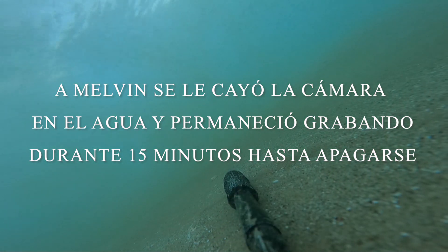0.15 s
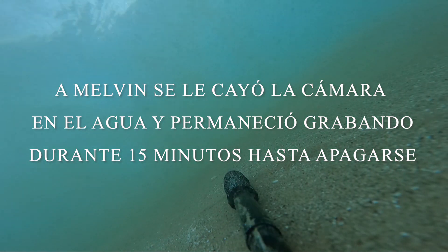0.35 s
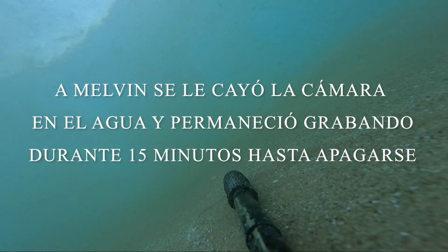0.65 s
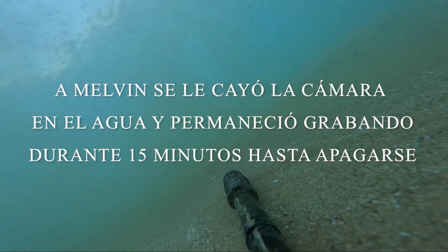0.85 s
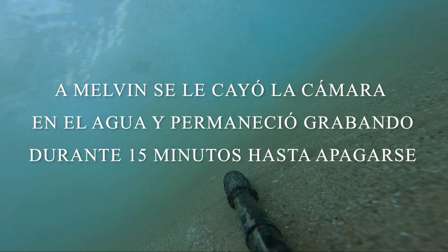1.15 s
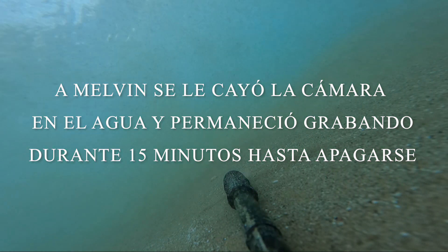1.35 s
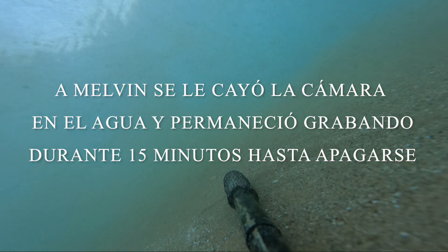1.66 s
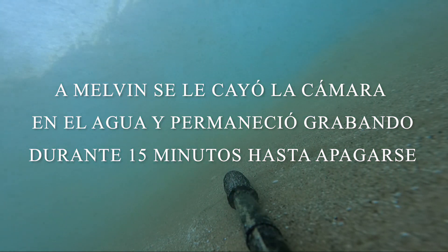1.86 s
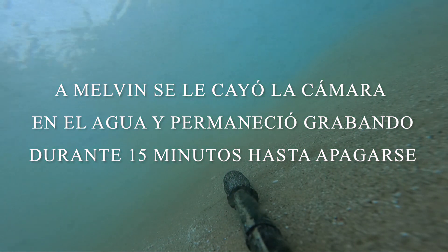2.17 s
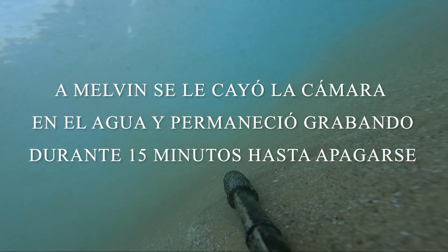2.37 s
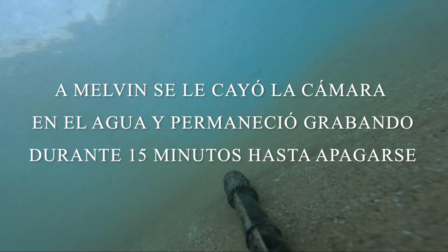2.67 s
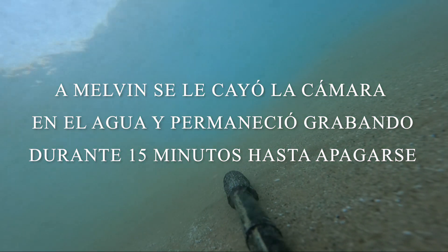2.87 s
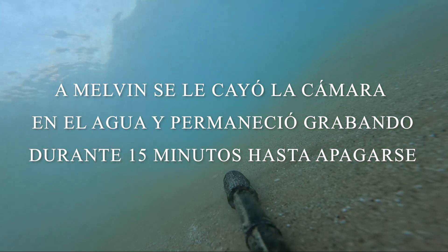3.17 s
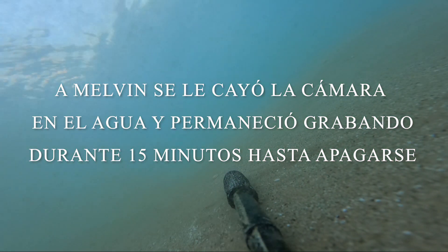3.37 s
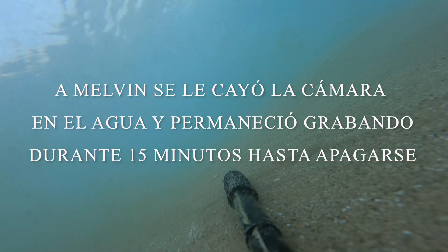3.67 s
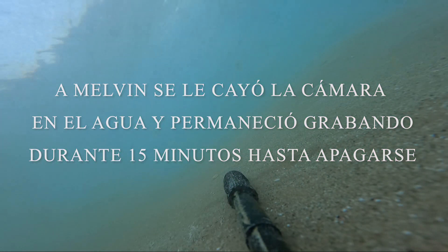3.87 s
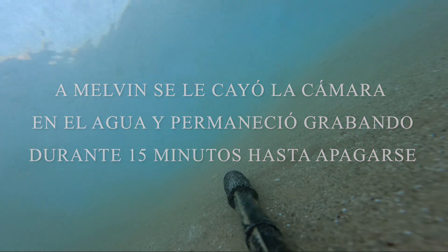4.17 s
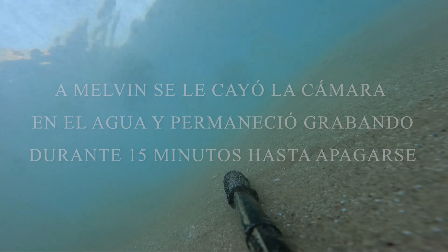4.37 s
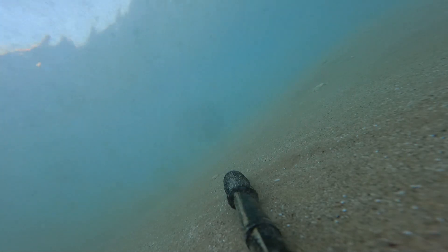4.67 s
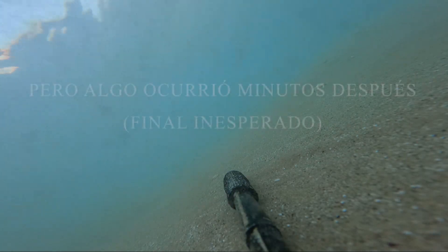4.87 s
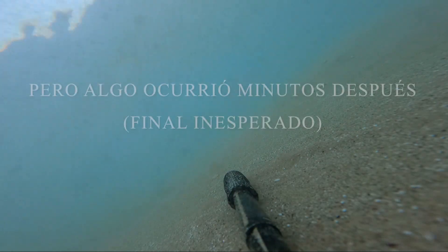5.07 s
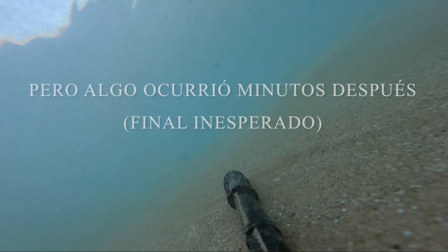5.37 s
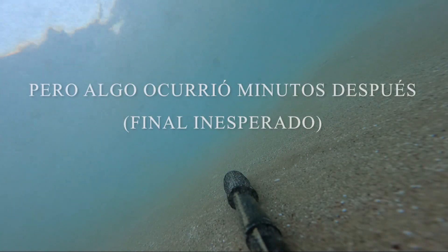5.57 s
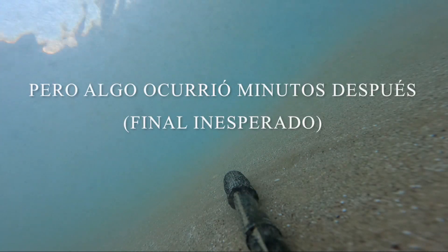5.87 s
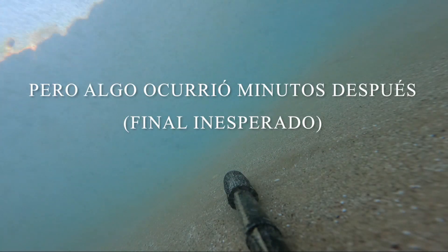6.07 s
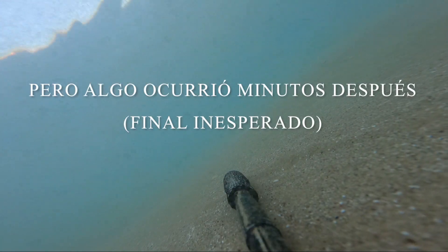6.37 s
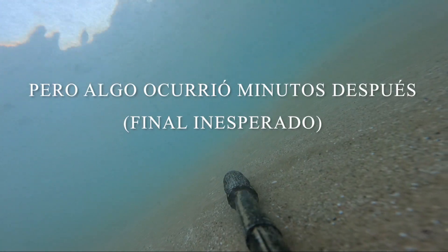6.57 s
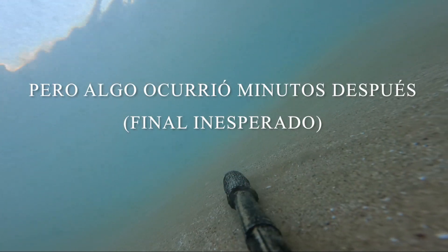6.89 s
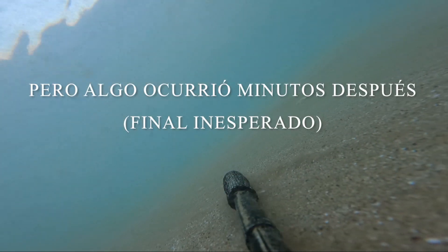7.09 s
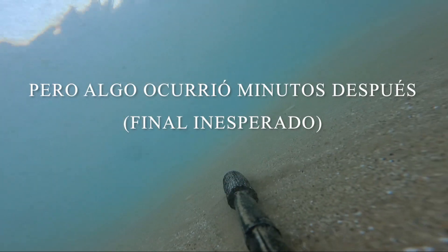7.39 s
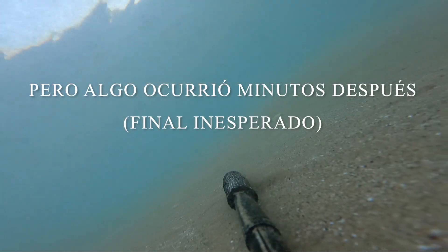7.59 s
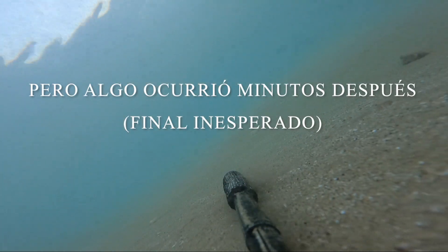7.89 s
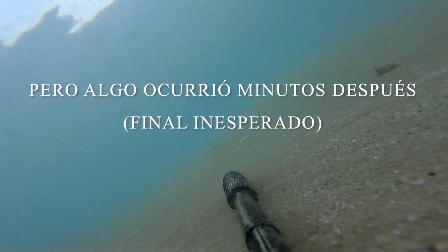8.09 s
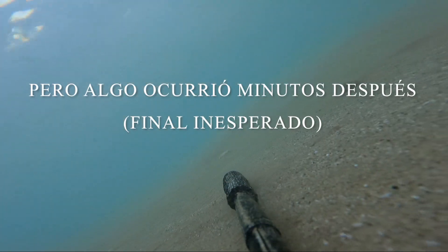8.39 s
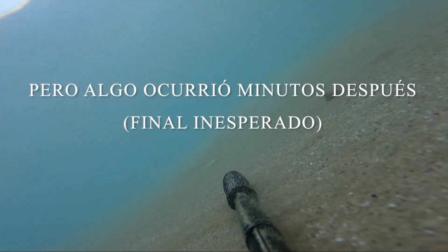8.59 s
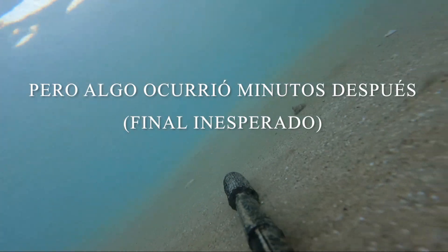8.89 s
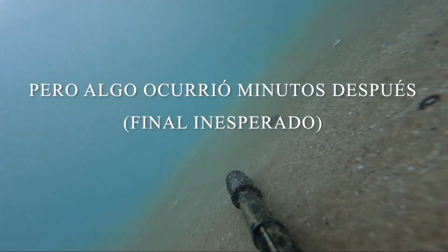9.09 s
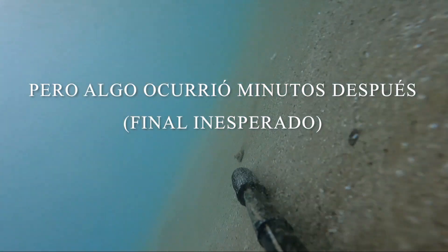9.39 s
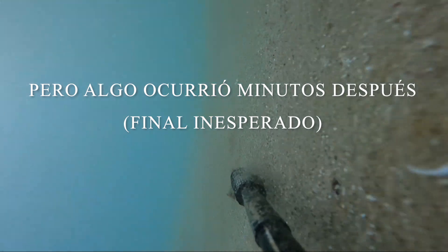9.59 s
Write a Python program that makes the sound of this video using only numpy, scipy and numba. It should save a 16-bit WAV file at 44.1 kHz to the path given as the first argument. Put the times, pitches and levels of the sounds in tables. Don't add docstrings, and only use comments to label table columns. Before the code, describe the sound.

Underwater, close and muffled, a sealed camera lies on a sandy bottom. A foamy wash with deep gulps and low wobbling rumble fades; a small bubbly crest passes, followed by dull thuds on sand. After a near-silent lull, waves build into a roaring churn with fizz and hissing sand, ending in scraping and fast hollow knocks.

```python
import sys
import numpy as np
from scipy import signal
from scipy.fft import rfft, irfft
from scipy.io import wavfile
from scipy.ndimage import uniform_filter1d
from numba import njit

SR = 44100
rng = np.random.default_rng(int(sys.argv[2]) if len(sys.argv) > 2 else 0)


def master(y):
    cut = np.clip(np.atleast_2d(y).T, -1, 1)
    pcm = np.round(cut * 32767)
    wavfile.write(sys.argv[1], SR, pcm.astype(np.int16))


def boost(x):
    u = np.asarray(x, float) / 20
    return 10 ** u


N = 429534

# [t/s, level/dB]
CHURN = [(0.0, -35), (1.1, -43.5), (1.9, -45.5), (2.33, -46.5), (2.6, -33), (2.82, -30.5), (3.2, -50.5),
         (4.1, -48.5), (4.3, -47.5), (4.55, -48.5), (4.83, -64.5), (6.07, -47.5), (6.67, -25.5),
         (7.13, -24.5), (8.11, -20.5), (8.6, -21), (9.3, -25.5), (9.74, -25.5)]
# [t/s, level/dB]
FLOW = [(0.0, -63.5), (0.9, -61), (1.4, -63.5), (2.45, -63.5), (2.64, -54), (2.74, -52.5), (2.93, -55.5),
        (3.71, -56.5), (4.03, -60.5), (4.97, -61), (5.86, -57), (6.53, -49), (6.93, -41.5), (7.79, -37),
        (8.89, -35.5), (9.4, -31.5), (9.6, -28), (9.74, -25.5)]
# [f/Hz, width/Hz, level/dB]
HOUSING = [(204, 100, 0), (380.4, 78, 3.5), (449, 98, -3), (583, 120, 4.5), (889, 230, -4), (1142, 58, 2),
           (1420, 55, 4.5), (1680, 54, 1.5), (1778, 50, 5), (1940, 69, -1), (2400, 600, 0.5),
           (2890, 270, 4), (4900, 62, -9.5), (4870, 130, 5.5)]
# [f/Hz, width/Hz, level/dB]
POLE = [
    (205.8, 30, 3),
    (383, 39, -6.5),
    (599, 45, -8.5),
]


def track(table):
    s, *columns = np.transpose(table)
    return [np.interp(np.arange(N) / SR, s, c) for c in columns]


def unit(x):
    return x / np.sqrt(np.mean(x ** 2))


def colour(x, points, bumps=()):
    hz = np.fft.rfftfreq(N, 1 / SR) + 1
    point_hz, point_db = np.array(points).T
    db = np.interp(np.log(hz), np.log(point_hz), point_db)
    db = db - 24 * np.log2(np.maximum(hz / point_hz[-1], 1))
    db = db + sum(d / (1 + (2 * (hz - f) / w) ** 2) for f, w, d in bumps)
    return unit(irfft(rfft(x) * boost(db), N))


def walk(rate):
    k = int(SR / rate)
    held = np.repeat(rng.standard_normal(N // k + 1), k)
    return 1.297 * uniform_filter1d(uniform_filter1d(held, k), k)[:N]


def swells(s, db, rise_db_s, fall_db_s):
    t = np.arange(0, N + 64, 64)[:, None] / SR
    below_peak_db = np.maximum((s - t) * rise_db_s, (t - s) * fall_db_s)
    power = boost(2 * (db - below_peak_db)).sum(axis=1)
    return np.interp(np.arange(N) / SR, t[:, 0], power)


@njit
def ring(start, hz, t60, peak, glide, length):
    y = np.zeros(length)
    for k in range(len(start)):
        steps = int(t60[k] * SR * .8)
        z, turn = peak[k] + 0j, np.exp((2j * np.pi * hz[k] - np.log(1000) / t60[k]) / SR)
        bend = np.exp(2j * np.pi * hz[k] * (glide - 1) / SR / steps)
        for i in range(start[k], min(start[k] + steps, length)):
            z *= turn
            turn *= bend
            y[i] += z.imag
    return y


def soft_rings(table, glide, quick):
    s, db, hz, t60 = table
    at = (s * SR).astype(np.int64)
    slow_ring = ring(at, hz, t60, boost(db + 3.5), glide, N)
    return slow_ring - ring(at, hz, quick * t60, boost(db + 4.5), 1 + quick * (glide - 1), N)


def cloud(points, bumps, count, cycles, scatter_db, flicker_db, flicker_rate, hush_db):
    lo, hi = points[0][0], points[-1][0]
    when, size, strength = rng.random((count, 3)).T
    hz = lo * (hi / lo) ** size
    peak = hz * boost(-scatter_db * np.log(np.maximum(strength, 1 / 300)))
    bubbles = ring((when * N).astype(np.int64), hz, cycles / hz, peak, 1.196, N)
    hush = colour(rng.standard_normal(N), points, bumps)
    mix = colour(bubbles, points, bumps) + boost(hush_db) * hush
    return unit(mix * boost(flicker_db * walk(flicker_rate)))


def fed(layer, coarse=0):
    feeds = {"large": (-5.5, -8.5, 1.4, -1.5, -64.5), "middle": (-13, -3.5, 0.52, -2, -58.5),
             "small": (-15.5, 2.5, 0.77, -11, -53), "fizz": (-16.5, 1.5, 0.76, -29, -62.5)}
    # [t/s, peak/dB, rise/(dB/s), fall/(dB/s), coarseness/dB]
    foam_clouds = [(0.0, -20, 63, 18, 1), (0.6, -33, 62.5, 29.5, -1), (0.85, -34.5, 57, 53, 3),
                   (1.1, -39, 62, 6, -0.5), (2.03, -36.5, 54.5, 31.5, -14), (2.33, -45, 38, 32, -8.5),
                   (2.66, -31, 46, 31.5, 5.5), (3.0, -41, 60.5, 25.5, -8.5), (3.4, -42, 39.5, 28, -7.5),
                   (3.58, -40, 42.5, 28, -9.5), (4.3, -51.5, 93, 62, -12.5), (4.48, -50.5, 93, 92, -2),
                   (5.37, -53, 200, 11, 1.5), (5.75, -49.5, 40.5, 13, 0.5), (6.18, -34, 395, 26.5, 2),
                   (6.5, -35, 36.5, 27, 6), (7.05, -32, 58.5, 25.5, 9), (7.51, -26.5, 60, 70, 1),
                   (7.8, -32, 57.5, 61, 2.5), (8.11, -30, 58, 92, 1), (8.79, -31.5, 61, 30, -5),
                   (9.33, -34, 91.5, 29, 0), (9.52, -26, 87.5, 95, -2), (9.72, -29, 54.5, 29.5, 2)]
    full_flow_db = -38
    churn_db, flow_db, follows, foam_db, calm_db = feeds[layer]
    s, db, rises, fades, coarse_db = np.transpose(foam_clouds)
    foam = swells(s, db + foam_db + coarse * coarse_db, rises, fades)
    flow = full_flow_db + flow_db + follows * (track(FLOW)[0] - full_flow_db)
    return np.sqrt(boost(2 * (track(CHURN)[0] + churn_db)) + boost(2 * flow) + foam + boost(2 * calm_db))


def roar():
    # [f/Hz, level/dB]
    spectrum = [(25, -31), (55, -1), (78, 6), (120, 3.5), (160, 1), (260, -43)]
    return boost(track(CHURN)[0]) * cloud(spectrum, HOUSING, count=6000, cycles=11., scatter_db=1.4,
                                        flicker_db=1.5, flicker_rate=3.6, hush_db=2.0)


def large_bubbles():
    # [f/Hz, level/dB]
    spectrum = [(100, -36), (135, -7.5), (160, 0), (225, 0), (265, -8), (400, -32.5)]
    return fed("large", coarse=.6) * cloud(spectrum, HOUSING, count=5000, cycles=15.0, scatter_db=-0.4,
                                           flicker_db=1.0, flicker_rate=13, hush_db=-2.0)


def middle_bubbles():
    # [f/Hz, level/dB]
    spectrum = [(170, -33.5), (230, -3.5), (260, 2.5), (400, -1.5), (460, -1), (700, -28.5)]
    return fed("middle", coarse=-0.34) * cloud(spectrum, HOUSING, count=7000, cycles=19.2, scatter_db=2.0,
                                               flicker_db=1.32, flicker_rate=9.9, hush_db=-1)


def small_bubbles():
    # [f/Hz, level/dB]
    spectrum = [(300, -33.5), (410, -1), (450, -5.5), (730, -3.5), (800, -11), (1100, -32.5)]
    return fed("small") * cloud(spectrum, HOUSING, count=10000, cycles=15.0, scatter_db=1.0,
                                flicker_db=0.5, flicker_rate=11, hush_db=-5)


def fizz():
    # [f/Hz, level/dB]
    spectrum = [(500, -18.5), (800, -2.5), (1050, -1), (1490, -4.5), (1550, -11.5), (1900, -14),
                (2300, -25.5), (3500, -53)]
    return fed("fizz") * cloud(spectrum, HOUSING, count=20000, cycles=22.0, scatter_db=1.5,
                               flicker_db=1.3, flicker_rate=11, hush_db=0.5)


def sand():
    # [f/Hz, level/dB]
    spectrum = [(1100, -37), (1500, -6), (1750, -4.5), (2300, -3), (3500, -10.5), (3800, -19), (5300, -26),
                (5900, -39.5), (7300, -46), (10500, -66)]
    # t/s, depth/dB, half length/s
    hiss_dip = (9.54, -8, 0.045)
    s, depth_db, half = hiss_dip
    db = track(FLOW)[0] + depth_db * np.exp(-((np.arange(N) / SR - s) / half) ** 2)
    return boost(db) * cloud(spectrum, HOUSING, count=50000, cycles=8.1, scatter_db=3.0,
                           flicker_db=0.35, flicker_rate=7.8, hush_db=2.5)


def grit():
    # [f/Hz, level/dB]
    spectrum = [(2500, -13.5), (3600, -5.5), (5200, -8.5), (6700, -13.5), (8000, -26), (10500, -50)]
    # [t/s, peak/dB, rise/(dB/s), fall/(dB/s)]
    stirred = [
        (2.56, -74.5, 60, 30),
        (2.7, -69.5, 40, 30),
        (3.5, -77, 20, 15),
        (4.2, -78.5, 20, 21),
    ]
    steady_db = -76
    gain = np.sqrt(boost(2 * steady_db) + swells(*np.transpose(stirred)))
    return gain * boost(.8 * walk(11)) * colour(rng.standard_normal(N), spectrum)


def surf():
    eddies = walk(16)
    gurgle = boost(0.5 * (eddies - uniform_filter1d(eddies, size=SR // 4)))
    finer = small_bubbles() + fizz() + sand()
    return roar() + large_bubbles() + middle_bubbles() + gurgle * finer + grit()


def seethe():
    # [t/s, peak/dB, rise/(dB/s), fall/(dB/s)]
    sheets = [(1.9, -61, 8, 13.5), (2.3, -64, 13, 19.5), (2.55, -57, 30.5, 27.5), (2.72, -50.5, 33, 23.5),
              (2.9, -52.5, 31, 24.5), (4.6, -59.5, 8, 6), (3.2, -53.5, 21.5, 16.5), (6.3, -47, 29.5, 14.5),
              (6.8, -42.5, 25.5, 27.5), (7.0, -39.5, 59, 41.5), (7.6, -42.5, 40.5, 39.5),
              (9.0, -33, 39.5, 30), (8.3, -40.5, 91, 91), (9.33, -27.5, 87.5, 23), (9.5, -27.5, 88, 60),
              (9.66, -24, 58.5, 13.5)]
    # [f/Hz, level/dB]
    spectrum = [(700, -30), (960, -19.5), (1060, 0), (1480, -2.5), (1600, -8), (1850, -10.5), (2050, -25),
                (2600, -42)]
    return swells(*np.transpose(sheets)) ** .5 * cloud(spectrum, HOUSING, count=9000, cycles=15.0, scatter_db=2.0,
                                                       flicker_db=-0.55, flicker_rate=12, hush_db=-2.5)


def pressed(water):
    # [f/Hz, width/Hz, level/dB]
    shifted_rings = [(2120, 230, -6), (2360, 150, 3.5), (1280, 160, -2), (905, 100, -0.5)]
    begins_db, span_db = -52, 10.5
    share = np.clip((track(FLOW)[0] - begins_db) / span_db, 0, 1)
    changed = colour(water, [(20, 0), (20000, 0)], shifted_rings) * np.std(water)
    return water + share * (changed - water)


def rocking():
    # [t/s, level/dB, f/Hz]
    swing_path = [(0.0, -24.5, 36.93), (0.4, -30, 43.5), (1.0, -28, 40.07), (1.4, -29, 46.98),
                  (1.92, -27.5, 44.81), (2.2, -32, 36.01), (2.85, -33, 37.06), (3.17, -40.5, 36.8),
                  (3.45, -38, 33.76), (3.9, -35, 34.18), (4.2, -40, 30.02), (4.55, -39, 35.33),
                  (5.0, -52, 31.02), (6.1, -46, 31.26), (6.6, -37, 44.03), (7.0, -37.5, 52.8),
                  (8.3, -35, 54), (9.74, -29.5, 54.65)]
    # [t/s, peak/dB]
    shoves = [(0.0, -24), (0.11, -25.5), (0.24, -16), (0.36, -16.5), (0.5, -17), (0.65, -18), (0.73, -14.5),
              (0.86, -14), (.98, -22), (1.1, -25), (1.22, -23), (1.33, -19), (1.57, -23.5), (1.69, -28),
              (1.9, -25), (2.19, -27), (2.28, -28), (3.53, -35), (3.63, -25.5), (3.94, -24.5), (4.09, -33),
              (4.32, -21), (4.48, -29), (4.57, -32), (5.42, -45), (6.48, -37), (6.55, -32), (6.97, -25),
              (7.16, -33.5), (7.32, -24), (8.3, -26), (8.66, -28), (8.79, -26), (8.9, -27), (9.41, -26.5),
              (9.66, -17.5)]
    # [t/s, level/dB]
    rocking_dips = [
        (3.56, 0),
        (3.59, -14),
        (3.8, -14),
        (3.86, 0),
        (4.2, 0),
        (4.23, -9),
        (4.36, -9),
        (4.4, 0),
    ]
    db, hz = track(swing_path)
    size = np.sqrt(boost(2 * db) + swells(*np.transpose(shoves), rise_db_s=249, fall_db_s=167.5))
    phase = 2 * np.pi * np.cumsum(hz * (1 + .07 * walk(16))) / SR
    swing = np.sin(phase) * boost(1.8 * walk(11))
    spectrum = [(8, -28.5), (22, -1.0), (45, -4.0), (70, -13), (140, -42.5), (400, -65.5)]
    eddies = colour(rng.standard_normal(N), spectrum)
    return size * boost(track(rocking_dips)[0]) * unit(unit(swing) + boost(-2) * eddies)


def knocks():
    # [t/s, peak/dB, brightness/dB]
    blows = [(9.255, -9.5, -19), (9.284, -11, -18.5), (9.33, -8.5, -18), (9.359, -15, -9.5),
             (9.383, -15, -12), (9.412, -5.5, -12.5), (9.436, -11.5, -17), (9.476, -8.5, -8.5),
             (9.494, -12.5, -16), (9.5109, -3, -13), (9.556, -10.5, -17), (9.588, -11, -13),
             (9.616, -7, -20), (9.671, -11, -16), (9.698, -13, -14.5), (9.718, -5, -16)]
    sag_per_s = .15
    s, db, bright_db = np.transpose(blows)
    pole = np.zeros(N)
    for k, (hz, _, ring_db) in enumerate(POLE):
        peak_db = db - 6 + (k > 0) * (bright_db + ring_db + 13)
        pitch = hz * (1 - sag_per_s * (s - 9.5))
        t60 = 2.4 / hz ** .5 + 0 * s
        pole += soft_rings((s, peak_db, pitch, t60), glide=.98, quick=.12)
    return pole


def thumps():
    # [t/s, peak/dB, f/Hz, t60/s]
    bumps_on_sand = [(3.625, -13.5, 37.5, 0.22), (3.651, -14.5, 37.7, 0.19), (3.716, -13, 34.6, 0.34),
                     (3.773, -23, 40.5, .16), (4.222, -23.5, 40, 0.25), (4.253, -26, 69, 0.092),
                     (4.345, -24.5, 75, 0.11), (4.8, -45.5, 100, .2), (4.281, -18, 50, 0.11),
                     (4.315, -16.5, 40.1, 0.15), (4.442, -25, 85.8, 0.15), (4.466, -27, 45.6, .2),
                     (4.53, -32.5, 93, 0.27), (4.49, -34, 120, .15), (4.58, -39, 70, .2),
                     (5.42, -42.5, 80, .2), (5.98, -38, 60, .15), (2.25, -33, 80, .15), (4.07, -32, 35, .2)]
    return soft_rings(np.transpose(bumps_on_sand), glide=0.99, quick=0.15)


def drag():
    # [t/s, level/dB]
    scrapes = [(8.9, -23), (9.1, -23), (9.2, -25), (9.26, -30), (9.39, -28), (9.45, -29), (9.52, -32),
               (9.6, -28), (9.74, -28)]
    db, = track([(scrapes[0][0] - .15, -70)] + list(scrapes))
    modes = [(f, w, d + 30) for f, w, d in POLE]
    spectrum = [(100, -18.5), (180, -0.5), (650, -2.5), (900, -24.5)]
    return boost(db - 3.5) * colour(rng.standard_normal(N), spectrum, modes)


def pops():
    # [t/s, peak/dB, f/Hz, t60/s]
    bubbles = [(0.688, -33.5, 1070, 0.055), (0.808, -41, 1326, 0.037), (0.8798, -32.5, 1380, 0.036),
               (0.8977, -35.5, 1330, 0.032), (0.9, -41, 1700, .025), (0.632, -41, 1440, 0.032),
               (0.752, -41.5, 1450, .025), (1.035, -40, 1120, .03), (9.527, -16, 1693, .015),
               (0.9954, -24.5, 1480, 0.028), (1.4352, -38, 1117, 0.035)]
    return soft_rings(np.transpose(bubbles), glide=1.03, quick=0.32)


def gulps():
    # [t/s, peak/dB, f/Hz, t60/s]
    pockets = [(.03, -21.5, 380, 0.13), (.095, -17, 249, 0.11), (.11, -15.5, 176, .15),
               (.14, -16, 262, .12), (.2, -15.5, 240, 0.14), (.35, -23, 400, .07), (.82, -22, 245, 0.13),
               (2.25, -34, 720, 0.076), (2.565, -27.5, 215, .08), (2.66, -22, 230, 0.076),
               (2.65, -28.5, 590, .04), (2.61, -29.5, 880, .05), (2.68, -28, 750, .04),
               (2.56, -33, 850, .05), (2.74, -33, 1000, .05), (2.67, -23, 215, .08), (2.74, -24, 225, 0.05),
               (5.79, -35, 500, 0.076), (5.45, -39, 560, 0.11), (0.46, -17.5, 250, 0.086),
               (0.5, -24, 244, 0.092), (0.572, -17, 243.4, 0.085), (.653, -23.5, 230, .1),
               (1.054, -22.5, 270, .1), (1.4628, -25.5, 221, 0.066), (2.049, -27.5, 418, 0.087),
               (3.408, -32.5, 588, 0.1), (3.49, -27, 330, .1), (3.77, -26, 265, .08),
               (7.566, -17.5, 116, 0.13), (7.765, -15, 92, 0.15), (8.05, -12, 88.2, 0.21),
               (8.11, -12, 93.2, 0.15), (4.2, -42, 130, 0.12), (4.524, -39, 133, 0.24),
               (5.068, -37, 185, 0.067), (5.095, -40, 370, 0.14), (5.182, -38, 362, 0.15),
               (5.359, -30, 186, 0.051), (6.172, -24, 230, 0.057), (6.905, -22.5, 192, .07),
               (7.8, -17, 276, 0.073), (7.045, -18.5, 170, .1), (7.28, -18, 130, .08),
               (8.3, -14.5, 125, .12), (8.36, -16.5, 80, .12), (5.6, -35.5, 600, .05),
               (7.534, -23.5, 593, .04), (7.2, -23, 150, 0.12), (7.8, -15.5, 138.6, 0.19),
               (7.17, -23.5, 210, 0.11), (5.3, -47, 300, 0.05), (2.048, -36, 593, 0.043)]
    return soft_rings(np.transpose(pockets), glide=1.12, quick=0.32)


def crest():
    # [t/s, level/dB, highest bubble f/Hz]
    passing = [(2.05, -61, 700), (2.25, -48, 784), (2.4, -38.5, 946), (2.55, -43, 1210),
               (2.66, -29.5, 1490), (2.76, -33.5, 1900), (2.9, -43, 1900), (3.05, -58.5, 1500)]
    s, db, top_hz = np.transpose(passing)
    when, size, strength = rng.random((2500, 3)).T
    at = s[0] + (s[-1] - s[0]) * when
    hz = np.interp(at, s, top_hz) * (0.381 + 0.646 * size)
    peak_db = np.interp(at, s, db) - 9 - 1.6 * np.log(strength) - 9 * size
    bubbles = soft_rings((at, peak_db, hz, 26.0 / hz), glide=1.07, quick=.27)
    return signal.sosfilt(signal.butter(4, 2300, fs=SR, output="sos"), bubbles)


def ticks():
    # [t/s, peak/dB]
    grains = [(0.204, -69), (0.338, -67), (0.387, -61), (0.38, -60), (0.584, -63), (1.69, -64),
              (1.729, -68), (2.087, -64), (2.116, -66), (2.17, -63), (2.617, -60), (2.645, -58),
              (2.684, -56), (3.27, -65), (3.767, -60), (3.868, -67), (4.143, -63), (4.154, -58),
              (4.427, -61), (4.436, -60), (4.495, -69), (5.436, -67), (6.311, -53), (6.4, -62), (6.56, -62),
              (6.595, -59), (6.652, -59), (6.668, -61), (6.79, -61), (6.879, -55), (7.031, -55)]
    tick_s = .006
    s, db = np.transpose(grains)
    hits = np.bincount((s * SR).astype(int), boost(db - 2), N)
    bursts = np.convolve(hits, np.hanning(int(tick_s * SR)))[:N]
    spectrum = [(900, -10.0), (2500, -4), (4500, -2.0), (7000, -9.5), (8200, -33.5)]
    return bursts * colour(rng.standard_normal(N), spectrum)


def airy_hiss():
    # [t/s, level/dB]
    haze = [(0, -116), (2.0, -116), (2.5, -104), (3.1, -100), (3.5, -90.5), (3.8, -104), (4.15, -92),
            (4.4, -104), (4.7, -92), (6.1, -93), (6.3, -104), (9.74, -104)]
    spectrum = [(6200, -22.0), (7200, 0.5), (8500, -5.0), (10000, -10.5), (11000, -24.5)]
    return boost(track(haze)[0]) * colour(rng.standard_normal(N), spectrum)


def second_port():
    # [t/s, level/dB, share 0-1]
    opened = [(1.76, -86, 0), (1.82, -55.5, 0.05), (2.1, -43, 0.18), (2.4, -36.5, 0.08), (2.62, -28.5, 0),
              (2.8, -34, 0.05), (3.0, -47, 0.1), (3.3, -60, 0.06), (3.75, -75, 0.03)]
    # [f/Hz, level/dB]
    spectrum = [(53, -38), (90, -4.5), (128, -11.5), (206, -2.5), (319, -9.5), (408, -1), (504, -9),
                (741, -1.5), (884, -5), (1750, -29), (2410, -45), (3080, -42), (6000, -55.5), (7800, -85),
                (13200, -120)]
    db, share = track(opened)
    bubbles = cloud(spectrum[1:-2], (), count=9000, cycles=9.8, scatter_db=2.5,
                    flicker_db=1.8, flicker_rate=3.6, hush_db=-2.0)
    return boost(db) * (db > -89) * bubbles, share


def scene():
    water = pressed(surf() + seethe())
    camera = rocking() + knocks() + thumps() + drag()
    first = water + camera + pops() + gulps() + crest() + ticks() + airy_hiss()
    second, share = second_port()
    left = (1 - share) * first - 0.075 * second
    right = (1 + share) * first + 1.59 * second
    return np.array([left, right])


def low_pass(x):
    return signal.sosfilt(signal.butter(12, 10700, fs=SR, output="sos"), x)


def record(dry):
    opening_s = 0.0012
    opening = 1 - .85 * np.exp(-np.arange(N) / SR / opening_s)
    limited = np.tanh(.8 * dry * opening) / .8
    return low_pass(limited)


dry = scene()
out = record(dry)
master(out)
```